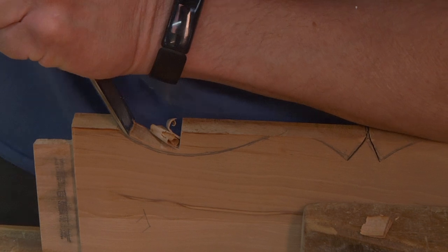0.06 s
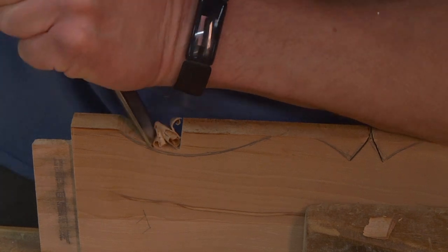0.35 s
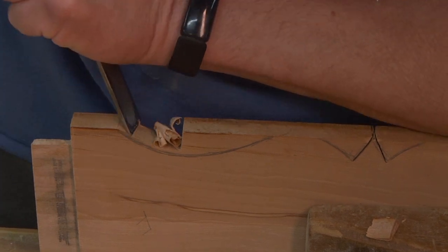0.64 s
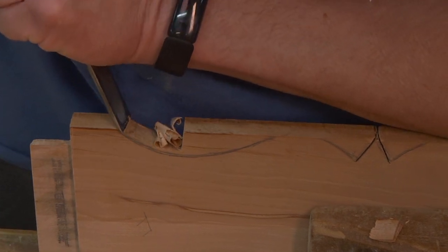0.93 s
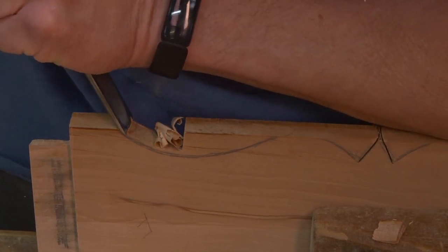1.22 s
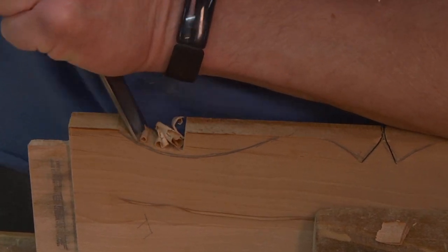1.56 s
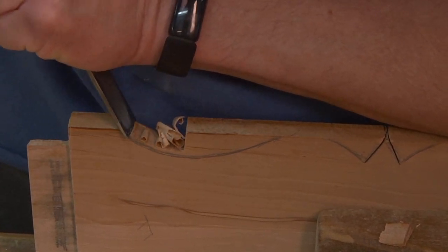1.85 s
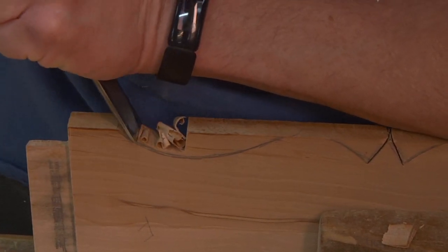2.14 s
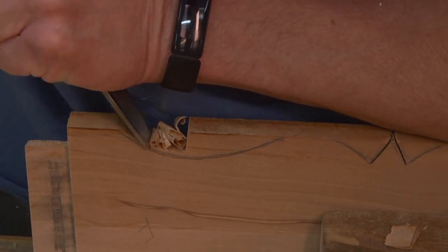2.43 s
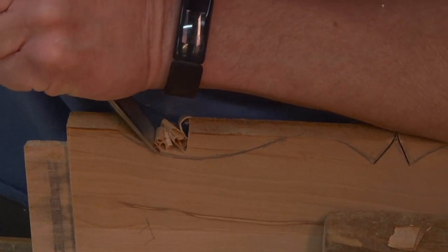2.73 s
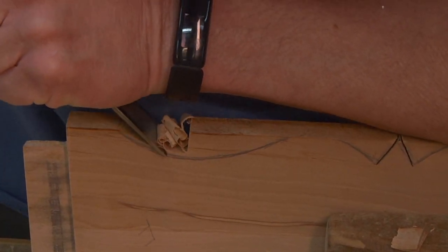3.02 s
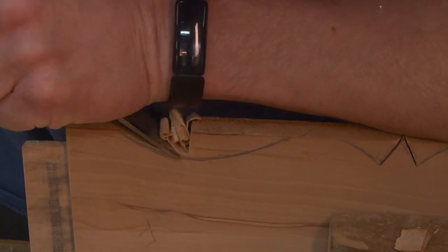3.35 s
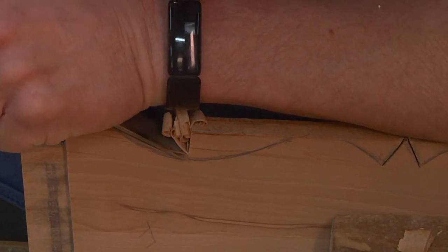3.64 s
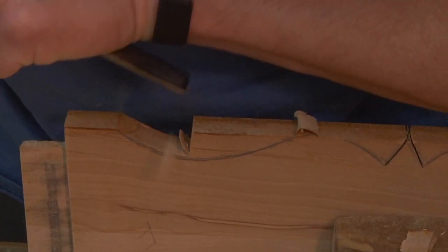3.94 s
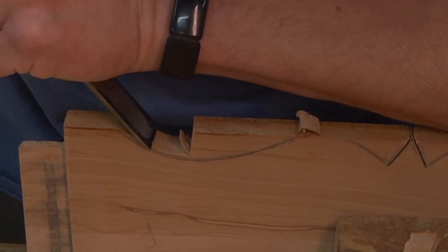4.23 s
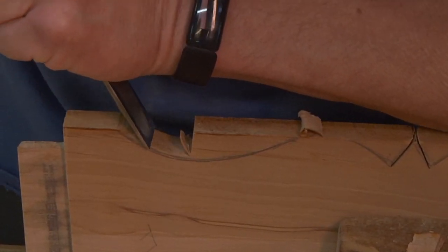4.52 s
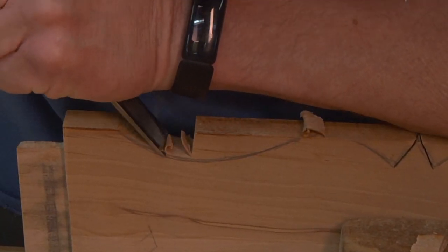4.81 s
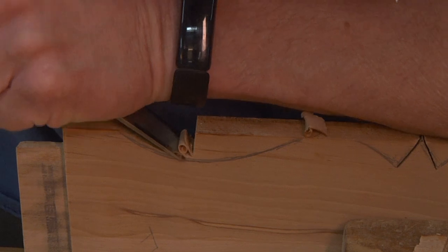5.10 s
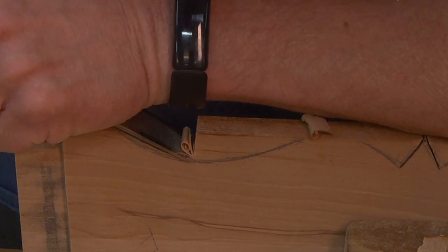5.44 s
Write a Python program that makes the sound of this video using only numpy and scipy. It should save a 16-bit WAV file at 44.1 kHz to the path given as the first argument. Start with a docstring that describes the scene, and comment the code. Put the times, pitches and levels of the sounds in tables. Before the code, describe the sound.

A hand chisel pares a wooden board in short, crunching cuts, with one bright snap as the shavings break free.

```python
"""A sharp hand chisel scoops curled shavings out of a clamped wooden board.
Each push is a run of tiny fibre fractures, impulses that crackle in the air and excite the damped
modes of board and bench. Chips snap off, dry curls tick and crinkle, and one bundle rips free.
A small workshop reverberates over a low background rumble."""
import sys
import numpy as np
from scipy import signal
from scipy.fft import rfft, irfft
from scipy.io import wavfile

SR = 44100
rng = np.random.default_rng(int(sys.argv[2]) if len(sys.argv) > 2 else 0)


def generate_wav(sig):
    """Save sig (samples, or channels by samples) to the path in sys.argv[1] as 16-bit PCM at SR."""
    pcm = np.round(np.clip(np.atleast_2d(sig).T, -1, 1) * 32767).astype(np.int16)
    wavfile.write(sys.argv[1], SR, pcm)


N = 250047
TIME = np.arange(N) / SR
SPLINTER_T60_S = 0.004

# low modes of bench and vice: (frequency [Hz], level [dB], T60 [s])
BENCH_MODES = [(93, 3, 0.036), (137.7, -1.5, 0.072), (176.7, -3, 0.14), (214.5, 0.5, 0.099),
               (307.5, -3, 0.047), (407.6, -2, 0.061), (524.6, -3, 0.038)]
# spectrum of cracking fibres: (frequency [Hz], level [dB])
CRACKLE_SPECTRUM = [(800, -4), (2500, 3), (4000, 5.5), (5000, -0.5), (6400, 2), (7400, -6.5), (10000, 2.5),
                    (11500, -4), (13500, 1), (15700, -2)]


def undb(db):
    """The decibel law: level to amplitude ratio."""
    return np.exp(np.asarray(db) * (np.log(10) / 20))


def unit(x):
    """Normalisation to unit energy."""
    return x / np.sqrt(np.sum(x ** 2) + 1e-18)


def through(x, response):
    """Convolution of a sound with an impulse response."""
    return signal.fftconvolve(x, response)[:len(x)]


def add(track, start_s, sound):
    """Superposition of a delayed sound on a track."""
    i = max(int(start_s * SR), 0)
    track[i:i + len(sound)] += sound[:max(N - i, 0)]


def colour(spectrum, size=4096):
    """Minimum-phase response for a spectrum of (frequency [Hz], level [dB]) points."""
    hz, db = np.transpose(spectrum)
    bins = np.maximum(np.arange(size // 2 + 1) * SR / size, 1)
    magnitude = undb(np.interp(np.log(bins), np.log(hz), db))
    cepstrum = irfft(np.log(magnitude))
    cepstrum[1:size // 2] *= 2
    cepstrum[size // 2 + 1:] = 0
    return unit(irfft(np.exp(rfft(cepstrum))))


def fade(t60, size):
    """Exponential decay, 60 dB down after t60 seconds."""
    return np.exp(-np.log(1000) * TIME[:size] / t60)


def spell(start, end, fade_s):
    """Envelope whose power rises linearly, holds and falls linearly."""
    return np.sqrt(np.clip(np.minimum(TIME - start, end - TIME) / fade_s, 0, 1))


def drift(points):
    """Slow random modulation, interpolated between Gaussian values."""
    return np.interp(TIME, np.linspace(0, TIME[-1], points), rng.standard_normal(points))


def resonance(hz, q, size=512):
    """Impulse response of two resonators in cascade: a short pulse centred on one frequency."""
    b, a = signal.iirpeak(hz, q, SR)
    first_stage = signal.lfilter(b, a, signal.unit_impulse(size))
    return unit(signal.lfilter(b, a, first_stage))


def fractures(per_s, spread_db):
    """Fibres part as a Poisson process, a few much harder than the rest; rms 1."""
    chance, strength = rng.random(N), np.minimum(rng.exponential(size=N), 3)
    pulses = (chance < per_s / SR) * undb(spread_db * strength) * rng.choice([-1, 1], N)
    return pulses / np.std(pulses)


def ring(modes, count=1, place_db=0, size=6144):
    """Modal superposition: one response per contact point, mode weights scattered by place_db."""
    partials = np.array([undb(db) * unit(np.sin(2 * np.pi * hz * TIME[:size]) * fade(t60, size))
                         for hz, db, t60 in modes])
    polarity = (-1) ** np.arange(len(modes))  # neighbouring modes swing in opposite directions
    weights = polarity * undb(place_db * rng.standard_normal((count, len(modes))))
    radiation = signal.butter(3, 95, "high", fs=SR, output="sos")  # small wood radiates no deep bass
    return [unit(row) for row in signal.sosfilt(radiation, weights @ partials)]


def board_rings(count, damped_db=1.0, damped_t60=0.057, size=6144):
    """Impulse responses of the board at count places: clear modes among many heavily damped ones."""
    # modes of the clamped board: (frequency [Hz], level [dB], T60 [s])
    board_modes = [ (418, -9, .12), (571, -9, .10), (633, -9, .13), (722, -3, .05), (760, 1, .05),
                   (874, -8, .10), (1001, -11, .13), (1086, -6, .06), (1139, -7, .11), (1206, -7, .11),
                   (1335, -14, .05), (1560, -11, .06), (1669, -3, .055), (1731, -4, .09), (1914, -5, .05),
                   (2051, -9, .08), (2117, -8, .08), (2310, -11, .04), (2620, -14, .06), (2940, -9, .04),
                   (3140, -13, .05), (3420, -12, .025), (3670, -14, .04), (4180, -20, .04), ]
    # spectrum of the dense, damped modes: (frequency [Hz], level [dB])
    wood_spectrum = [(150, -37.5), (450, -1), (800, -4.5), (1300, 0.5), (2200, 0), (2800, -8.5),
                     (3500, -5.5), (4600, -12.5), (7000, -14), (16000, -43.5)]
    wood = colour(wood_spectrum, size=1024)
    damped = rng.standard_normal((count, size)) * fade(damped_t60, size)
    clear = ring(board_modes, count, place_db=2.5)
    return [unit(modes + undb(damped_db) * unit(through(dense, wood)))
            for modes, dense in zip(clear, damped)]


def paring():
    """Forced vibration: the creeping edge drives the wood with faint fractures as a thin curl rustles."""
    # slow cuts, and near 4 s a shift of the hand that shakes the bench: (start [s], end [s], board level [dB],
    # bench level [dB])
    cuts = [ (0, 0.251, -61, -73), (.48, 0.716, -74, -72), (1.658, 2.034, -69.5, -66),
            (2.52, 2.726, -77.5, -70), (3.165, 3.635, -68.5, -68), (3.547, 3.903, -76, -81),
            (3.98, 4.225, -78, -60.5), (4.59, 5.54, -68, -70.5), ]
    # spectrum of the curl sliding up the blade: (frequency [Hz], level [dB])
    rustle_spectrum = [(1000, -22), (2500, -4.5), (4300, 5), (6000, -1), (8000, -1), (11000, -10),
                       (13000, -5), (15700, -9.5)]
    spells = np.array([spell(start, end, fade_s=0.084) for start, end, _, _ in cuts])
    _, _, board_db, bench_db = np.transpose(cuts)
    pressure = undb(-79.5) + undb(board_db) @ spells  # the edge never quite rests
    shaking = undb(bench_db) @ spells
    fits = undb(2.5 * drift(points=200))
    force = fractures(per_s=520, spread_db=7) * fits
    # so fine a cut rings mainly the higher modes of the board; only its slow part reaches the bench
    fine = signal.lfilter(*signal.butter(1, 1300, "high", fs=SR), force * pressure)
    slow = signal.lfilter(*signal.butter(2, 270, fs=SR), force * shaking)
    body = through(fine, board_rings(count=1)[0]) + through(slow, ring(BENCH_MODES)[0])
    cracks = (0.35 * force + 0.78 * rng.standard_normal(N) * fits) * pressure
    return body + undb(-8.5) * through(cracks, colour(rustle_spectrum, size=512))


def background(level_db=-64, waver_db=3.4):
    """Amplitude-modulated noise: a low, gently wavering rumble with a faint hiss."""
    # spectrum of the rumble and hiss: (frequency [Hz], level [dB])
    rumble_spectrum = [(20, 3), (45, 0.5), (100, 2), (180, 0), (270, -10.5), (500, -14.5), (1000, -18.5),
                       (2000, -20.5), (3500, -28.5), (7000, -31), (12000, -32.5), (16000, -31)]
    noise = through(rng.standard_normal(N), colour(rumble_spectrum))
    return noise * undb(level_db - waver_db * drift(points=40))


def workshop(build_s=0.018, size=32768):
    """Impulse response of a small room: a diffuse field builds, then each band decays at its own rate."""
    # reverberation times: (frequency [Hz], T60 [s])
    room_decay = [(150, 0.28), (1200, 0.39), (4000, 0.36), (6500, 0.33), (16000, 0.41)]
    # spectrum of the wall reflections: (frequency [Hz], level [dB])
    wall_spectrum = [(100, -12), (300, -3.5), (600, -3), (1100, -6), (2200, -5), (4000, -5.5), (6000, -9),
                     (11000, -12), (16000, -38)]
    noise = rfft(rng.standard_normal(size))
    bins = np.arange(size // 2 + 1) * SR / size
    hz, t60s = np.transpose(room_decay)
    bands = [irfft(noise * np.interp(bins, hz, share)) for share in np.eye(len(hz))]
    tail = sum(band * fade(t60, size) for band, t60 in zip(bands, t60s))
    onset = 1 - np.exp(-(TIME[:size] / build_s) ** 2)
    return unit(through(tail * onset, colour(wall_spectrum)))


def scatter(force, places, rings):
    """Superposition of slips, each ringing the wood with the response of its own contact point."""
    return unit(sum(signal.fftconvolve(force * (places == k), answer) for k, answer in enumerate(rings)))


def shaving(cracks, curl_hz=6000, curl_db=-8):
    """Radiation of cracks from the shaving: a broad rasp and the resonance of its curl."""
    flutter = unit(rng.standard_normal(256) * fade(t60=0.0025, size=256))
    curl = through(through(cracks, flutter), resonance(curl_hz, q=1.8))
    return through(cracks, colour(CRACKLE_SPECTRUM, size=512)) + undb(curl_db) * curl


def strokes(stop_s=0.01):
    """Impulse-train excitation: each push is a run of slips that ring board and bench and crackle."""
    # (start [s], duration [s], board level [dB], bench level [dB], crackle level [dB], cutoff [Hz])
    pushes = [ (0.089, 0.059, -62.5, -59, -62.5, 4000), (0.27, 0.033, -52.5, -54, -64, 2500),
              (.305, 0.049, -31, -43.5, -42, 4400), (0.598, 0.034, -59.5, -67.5, -71, 3020),
              (0.833, 0.0071, -62, -66, -83, 3020), (1.079, 0.038, -49.5, -46.5, -77, 1410),
              (1.175, .014, -52.5, -50, -64, 1400), (1.218, 0.047, -68, -65.5, -66, 3000),
              (1.518, 0.054, -32, -44, -47.5, 1930), (1.871, 0.037, -58.5, -59, -67, 1390),
              (2.013, 0.059, -44.5, -44.5, -53.5, 1670), (2.255, 0.03, -48.5, -44.5, -60.5, 1740),
              (2.34, .015, -59.5, -61, -64, 3000), (2.378, .02, -60, -55, -65.5, 2600),
              (2.42, .068, -42, -44.5, -51, 3250), (2.71, 0.034, -48.5, -47, -55, 4000),
              (2.735, 0.064, -47.5, -48.5, -69, 4000), (2.929, 0.028, -49.5, -51.5, -54.5, 3400),
              (3.159, 0.019, -59.5, -73, -67, 4000), (3.479, 0.044, -62.5, -67, -62.5, 5000),
              (4.666, 0.011, -63, -73, -62, 3400), (4.712, 0.048, -62, -56, -66, 3000),
              (4.761, 0.053, -41.5, -40.5, -50.5, 2460), (4.864, 0.029, -55.5, -51, -65, 2200),
              (4.932, 0.027, -47.5, -44, -56.5, 2600), (5.001, 0.045, -54, -53.5, -60.5, 2620),
              (5.081, 0.036, -55.5, -54.5, -64, 2620), (5.194, 0.086, -58, -58, -69, 2900), ]
    out = np.zeros(N)
    slips = fractures(per_s=1900, spread_db=3.5)
    fine_fibres = fractures(per_s=700, spread_db=5)
    tearing = slips + 1.23 * fine_fibres + 0.5 * rng.standard_normal(N)
    board, bench = board_rings(count=4), ring(BENCH_MODES, count=2, place_db=2.0)
    places = rng.integers(0, len(board), N)
    for start, length, board_db, bench_db, crackle_db, cutoff_hz in pushes:
        span = slice(int(start * SR), int((start + length + 2 * stop_s) * SR))
        stages_s = [0, 0.64 * length, length, length + stop_s]  # the edge bites, peaks, eases, stops
        pressure = undb(np.interp(TIME[span] - start, stages_s, [-11.5, 0, -8, -26]))
        effort = np.linalg.norm(pressure)
        force = slips[span] * pressure
        blunt = signal.butter(2, cutoff_hz, fs=SR)  # a slow, heavy slip holds less treble
        board_sound = signal.lfilter(*blunt, scatter(force, places[span], board))
        add(out, start, effort * undb(board_db) * unit(board_sound))
        add(out, start, effort * undb(bench_db) * scatter(force, places[span] % len(bench), bench))
        add(out, start, effort * undb(crackle_db) * unit(shaving(tearing[span] * pressure)))
    return out


def knocks(bench_limit_db=-41):
    """Impact excitation: a chip lets go or the blade lands, with one blow and a splintering crack."""
    # (time [s], board level [dB], centre frequency [Hz], crack level [dB])
    impacts = [ (.111, -53.5, 2880, -62), (.3305, -28, 950, -60), (1.082, -55.5, 950, -66),
               (1.102, -60, 920, -58.5), (1.179, -62, 1300, -64.5), (1.556, -39.5, 1630, -69),
               (1.883, -56.5, 790, -75), (1.969, -59.5, 1640, -65), (2.259, -55.5, 900, -59),
               (2.742, -38.5, 2460, -53), (2.7448, -39, 650, -80), (3.748, -62, 2200, -68),
               (4.307, -45.5, 1380, -67), (4.672, -63, 2000, -70), (4.778, -51, 1290, -62),
               (5.087, -62, 1200, -72), (5.108, -63, 3160, -58), (5.577, -60, 1600, -82), ]
    out, rasp = np.zeros(N), colour(CRACKLE_SPECTRUM)
    splinters = rng.standard_normal((len(impacts), 512)) * fade(SPLINTER_T60_S, size=512)
    responses = zip(board_rings(len(impacts)), ring(BENCH_MODES, len(impacts)), splinters)
    for (start, board_db, hz, crack_db), (board, bench, splinter) in zip(impacts, responses):
        blow = resonance(hz, q=1.16)
        drive = undb(board_db + 2)
        shake = drive / (1 + drive / undb(bench_limit_db))  # saturation: the bench gives no further
        add(out, start, undb(board_db) * unit(through(board, blow)))
        add(out, start, undb(board_db - 12) * blow)  # direct sound of the contact
        add(out, start, shake * undb(-2) * bench)
        add(out, start, undb(crack_db) * unit(through(splinter, rasp)))
    return out * np.sqrt(0.006 * SR)  # each level's energy is that of 6 ms


def curl_ticks():
    """Direct radiation: dry curls tick against the steel, too light to move the board; near 4.26 s the chisel
    gives one light tap."""
    # (time [s], level [dB], centre frequency [Hz])
    ticks = [ (.283, -71, 11000), (.297, -68, 11500), (3.155, -62, 15300), (3.359, -69, 15400),
             (3.470, -55, 14800), (3.490, -53, 13700), (3.788, -62.5, 7100), (3.9635, -66, 15000),
             (4.022, -54.5, 16500), (4.123, -64, 14700), (4.262, -63, 5160), (5.032, -60, 9700),
             (5.312, -59, 15200), (5.341, -64, 15000), ]
    out = np.zeros(N)
    for start, db, hz in ticks:
        crack = unit(rng.standard_normal(512) * fade(t60=0.012, size=512))
        ping = unit(through(crack, resonance(hz, q=2.7)))
        add(out, start, undb(db) * (ping + undb(-2) * crack))
    return out * np.sqrt(0.0031 * SR)


def crinkle():
    """Crackling noise: squeezed curls emit faint random ticks, each a high ping with a broad rasp."""
    # squeezes of the bundle: (start [s], end [s], level [dB])
    squeezes = [(3.24, 3.57, -75), (3.72, 3.833, -77), (3.933, 4.19, -75.5), (5.17, 5.35, -73)]
    pressure = sum(undb(db) * spell(start, end, fade_s=0.05) for start, end, db in squeezes)
    splinter = unit(rng.standard_normal(512) * fade(SPLINTER_T60_S, size=512))
    cracks = through(fractures(per_s=160, spread_db=5.5) * pressure, splinter)
    return through(cracks, resonance(hz=14400, q=1.5)) + undb(-4) * cracks


def snap(rip_s=3.897, burst_s=0.0049, rise_db_per_s=647, fall_db_per_s=392):
    """Release of strain: the levered bundle rips free with a bright crack and a hollow pop."""
    # jerks as it breaks free: (time [s], level [dB])
    jerks = [(3.9022, -35.5), (3.907, -34.5), (3.915, -36.5), (3.936, -45.5)]
    # hollow modes of the chip: (frequency [Hz], level [dB], T60 [s])
    chip_modes = [(173, -12.5, .08), (536, -7.5, 0.069), (639, -12, 0.11), (740, -3, 0.12),
                  (921, -2.5, 0.06), (1086, -1, 0.067), (1200, -1.5, 0.058), (1400, -6, 0.025),
                  (1720, -15, 0.016), (2110, -22, 0.024), (2500, -25, 0.075)]
    # spectrum of the last fibres ripping: (frequency [Hz], level [dB])
    rip_spectrum = [(1200, -20), (2500, -4), (3500, -11), (5000, -8), (11000, -9), (13000, -3), (15500, 2)]
    pops = np.zeros(N)
    for (start, db), chip in zip(jerks, ring(chip_modes, len(jerks), place_db=6.5)):
        add(pops, start, undb(db) * chip)
    t = TIME - rip_s
    strain = undb(-48.5 - np.maximum(-t * rise_db_per_s, t * fall_db_per_s))
    burst = undb(-35) * (t > 0) * (t < burst_s)
    rip = through(rng.standard_normal(N) * (strain + burst), colour(rip_spectrum, size=256))
    creak = through(fractures(per_s=1700, spread_db=3.0) * strain, board_rings(count=1)[0])
    return pops * np.sqrt(0.0074 * SR) + undb(1.5) * creak + rip


def scene():
    """Superposition of the direct sound, the reverberant field and the background."""
    direct = strokes() + knocks() + snap() + paring() + curl_ticks() + crinkle()
    reverberation = through(direct, workshop())
    return (direct + undb(-14.5) * reverberation + background())[None]


def record(dry):
    """Band limiting: a steep elliptic low-pass removes the treble above 16.1 kHz."""
    return signal.sosfilt(signal.ellip(10, 0.2, 70, 16100, fs=SR, output="sos"), dry)


dry = scene()
out = record(dry)
generate_wav(out)
```